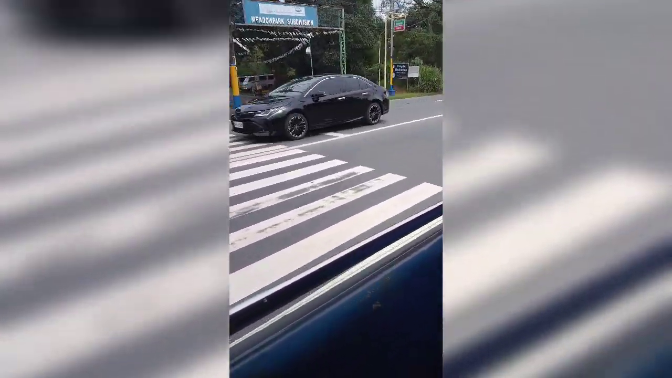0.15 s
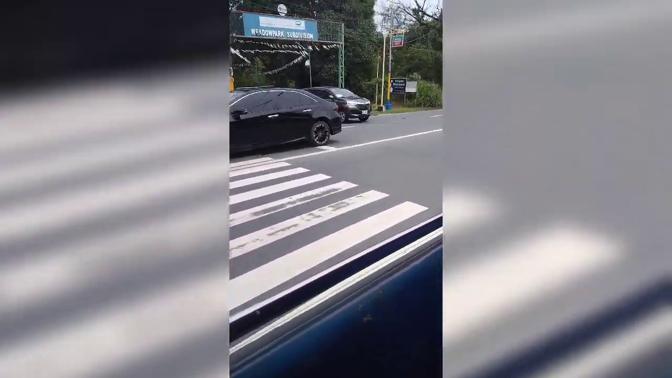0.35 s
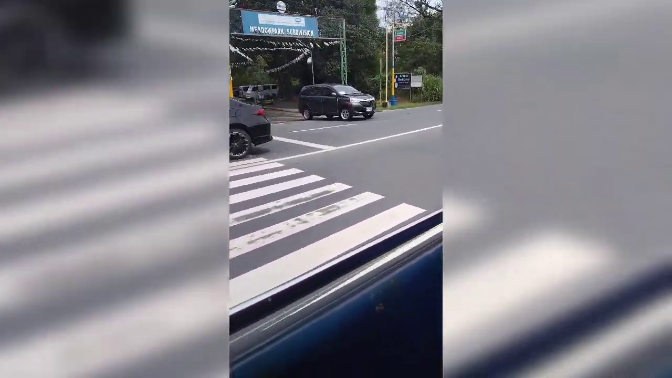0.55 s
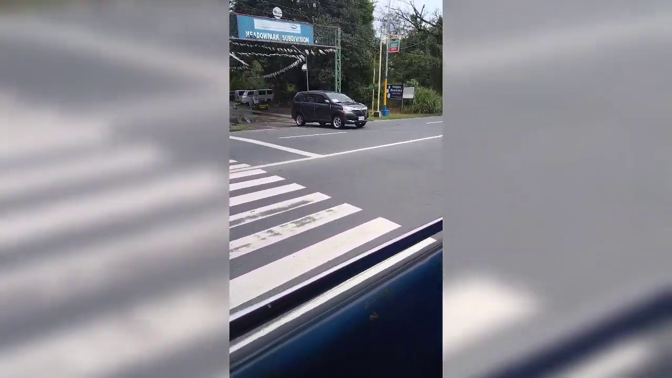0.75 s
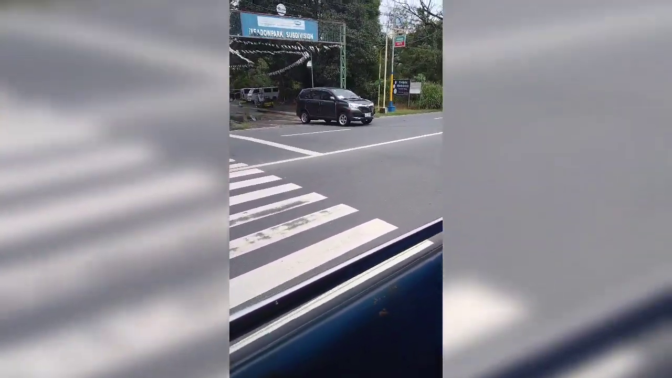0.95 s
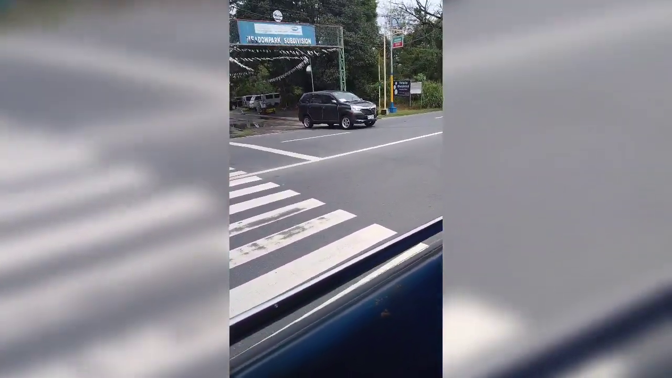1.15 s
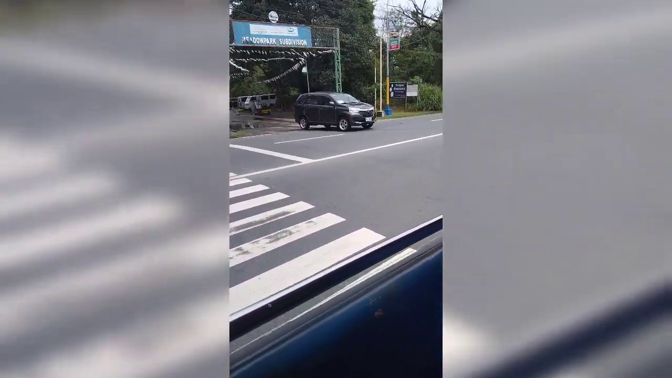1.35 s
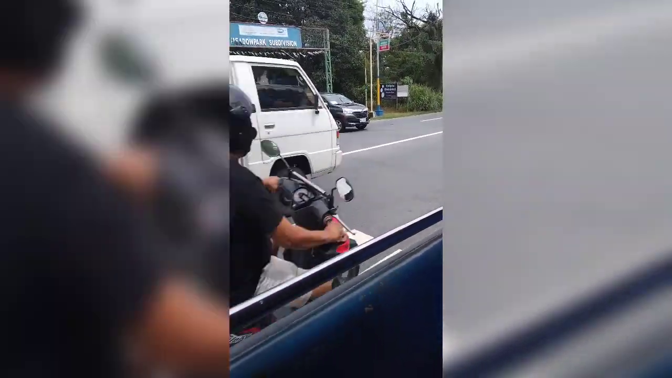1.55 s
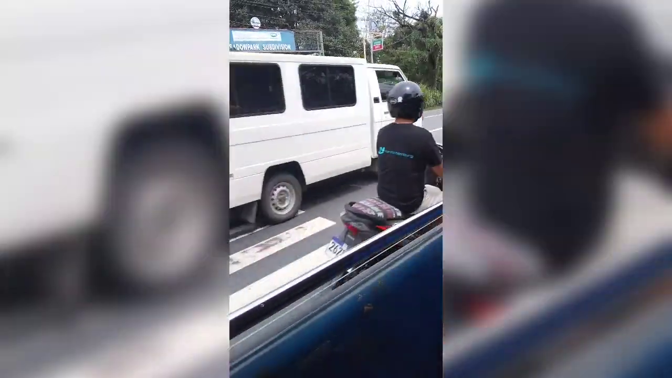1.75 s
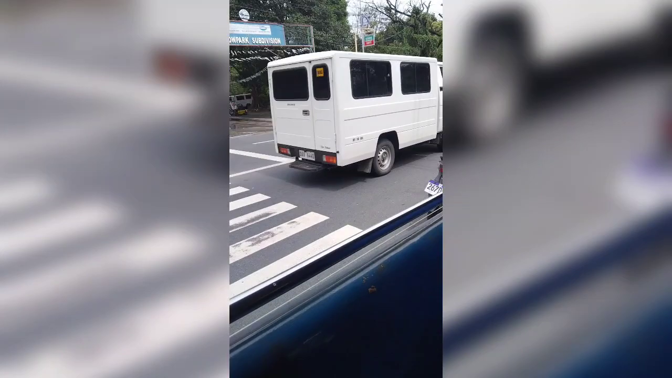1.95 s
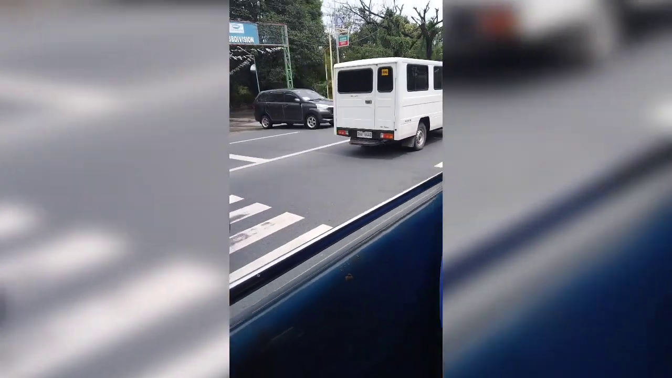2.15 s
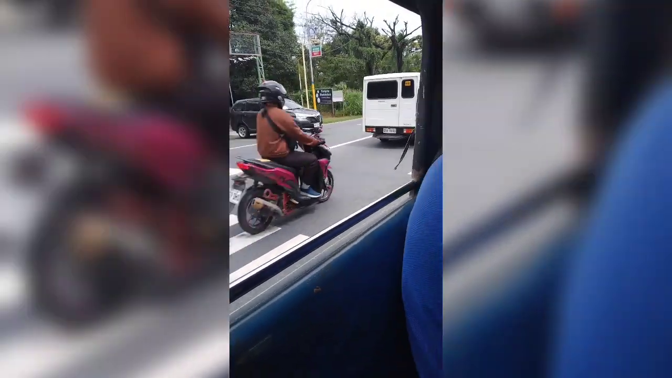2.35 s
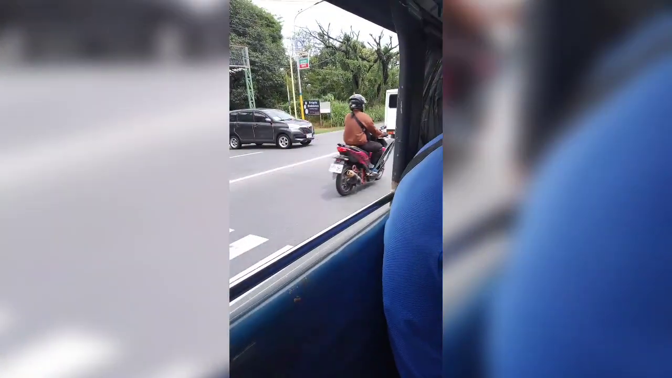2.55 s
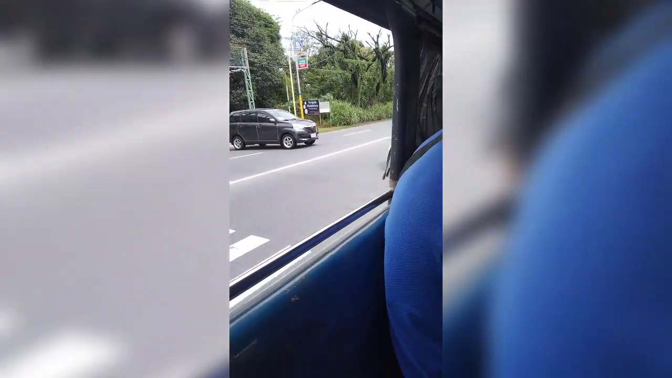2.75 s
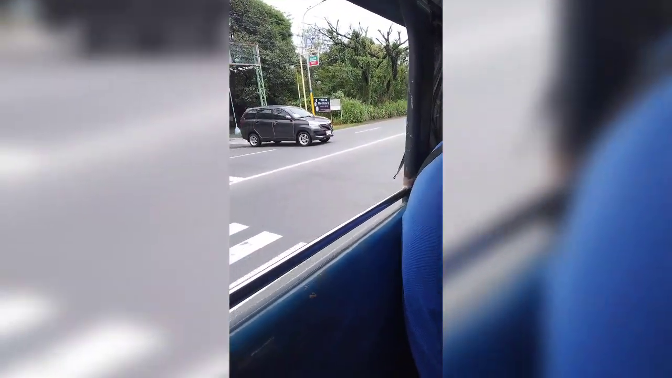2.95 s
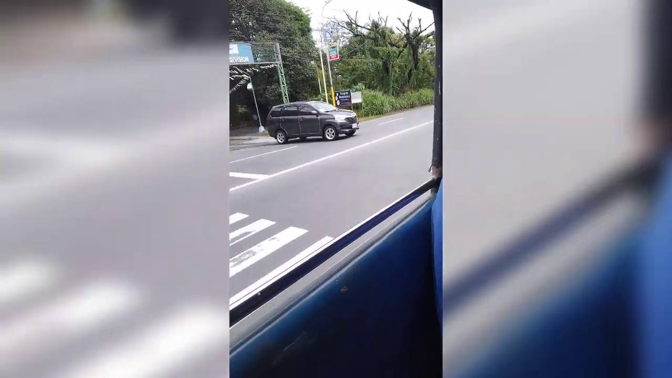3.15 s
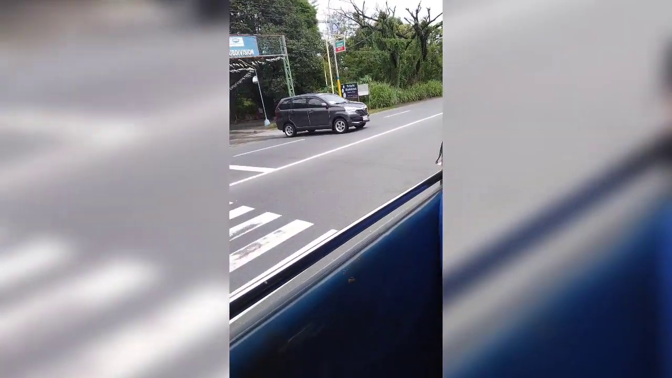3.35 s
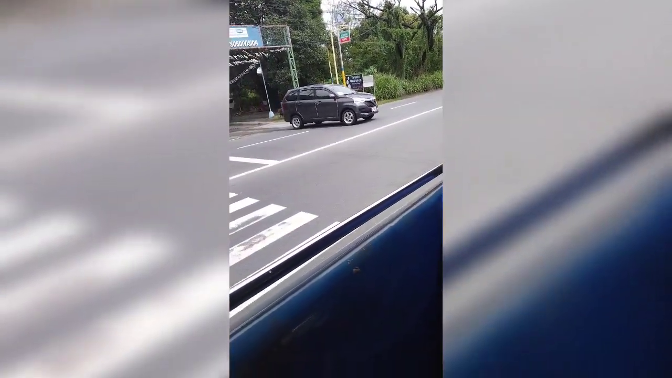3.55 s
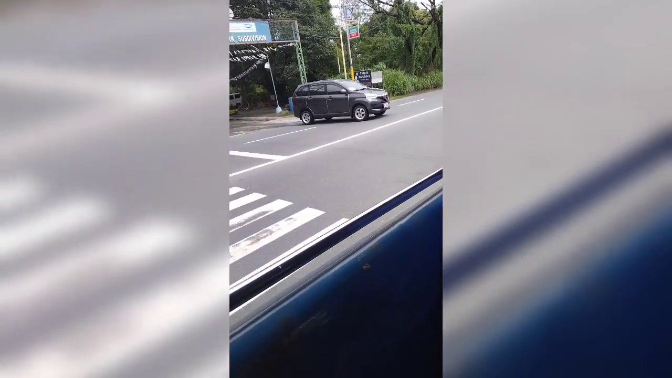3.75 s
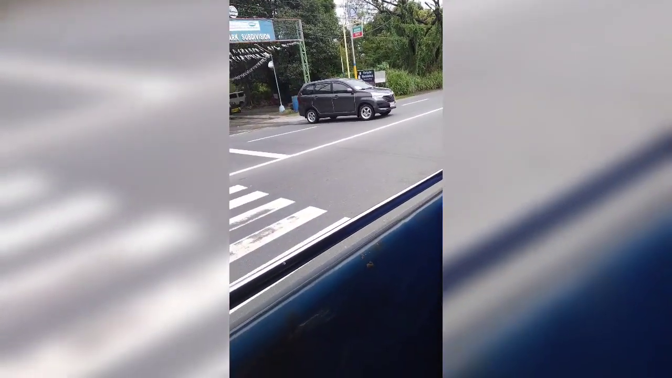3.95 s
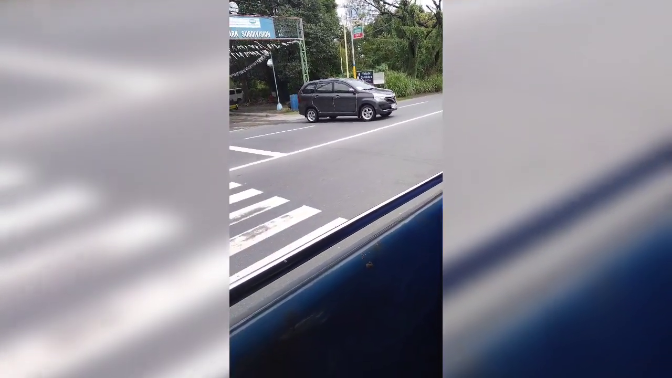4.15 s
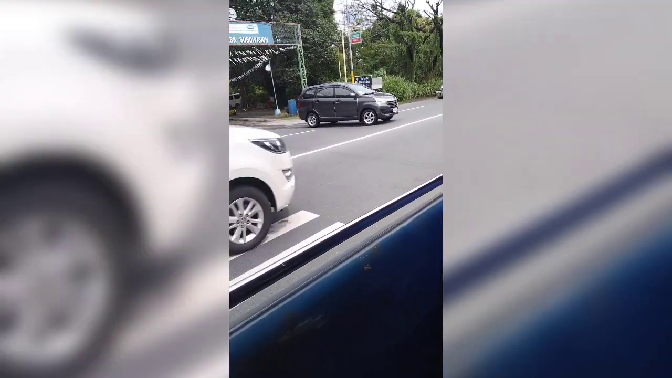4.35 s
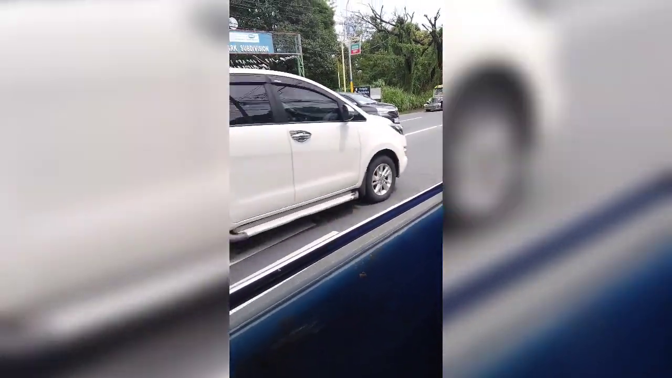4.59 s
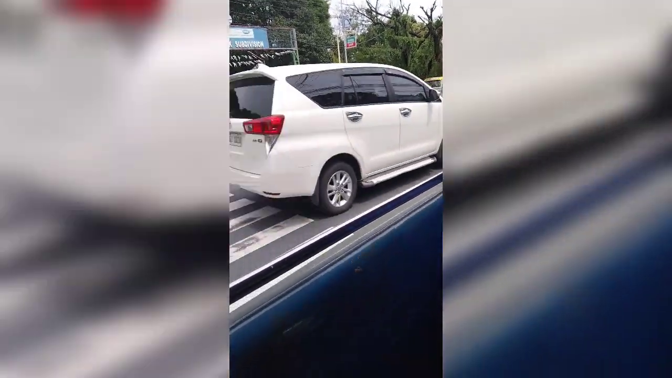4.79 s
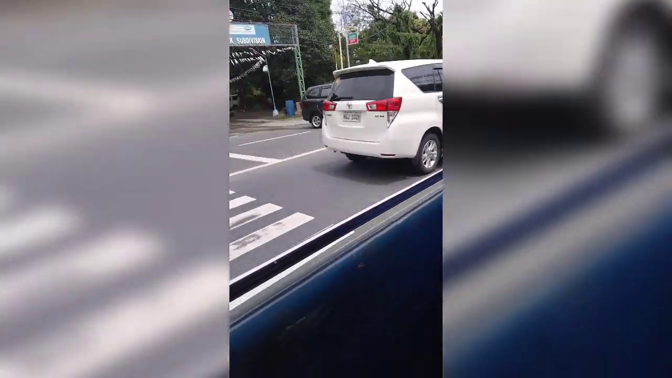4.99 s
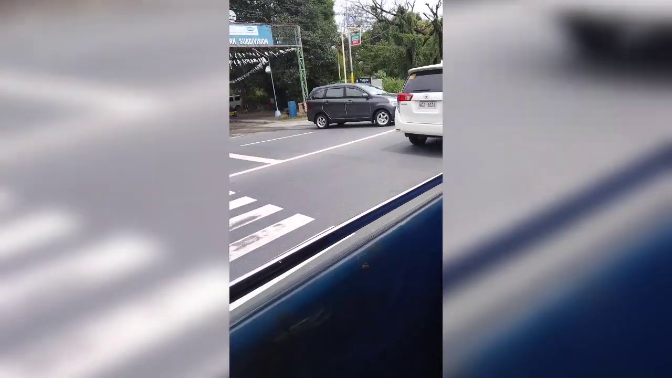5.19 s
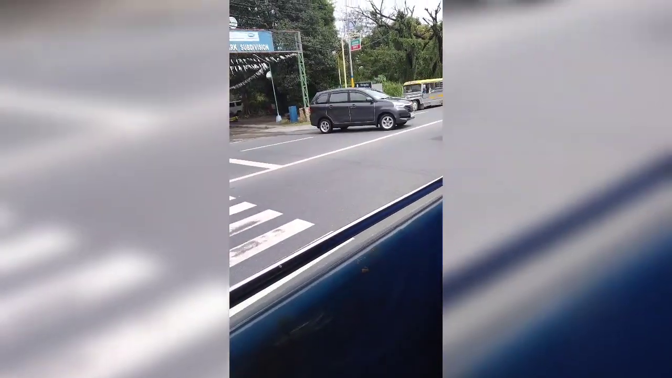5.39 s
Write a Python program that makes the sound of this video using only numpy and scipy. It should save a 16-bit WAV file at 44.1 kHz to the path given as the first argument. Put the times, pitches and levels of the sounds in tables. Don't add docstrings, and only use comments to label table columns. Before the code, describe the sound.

Traffic heard at a vehicle window: two motorbikes sweep by with low exhaust notes, a dull door shuts, and a car whooshes past.

```python
import sys
import numpy as np
from scipy import signal
from scipy.fft import rfft, irfft, next_fast_len
from scipy.io import wavfile
from scipy.ndimage import uniform_filter1d

SR = 44100
rng = np.random.default_rng(int(sys.argv[2]) if len(sys.argv) > 2 else 0)


def inscribe(sig):
    pcm = np.round(np.clip(np.atleast_2d(sig).T, -1, 1) * 32767)
    wavfile.write(sys.argv[1], SR, pcm.astype(np.int16))


def gain_from_db(level_db):
    decades = np.asarray(level_db, float) / 20
    return 10 ** decades


N = 239154
T = np.arange(N) / SR
FFT = next_fast_len(N)
HZ = np.arange(FFT // 2 + 1) * SR / FFT

# (frequency [Hz], density [dB per Hz])
STREET_SPECTRUM = [(25, -32.5), (70, -3), (113, -2.5), (250, -7.5), (550, -10.5), (800, -19.5),
                   (1370, -15.5), (2000, -11.5), (3000, -20.5), (5000, -24.5), (8300, -27), (9500, -30),
                   (12000, -33.5), (15400, -37)]
STREET_DB = -39
# (frequency [Hz], width [Hz], level [dB])
CABIN_MODES = [(918, 170, -56), (1321, 97, -50.5), (1678, 52, -54.5), (2190, 49, -63), (2400, 46, -57),
               (3835, 410, -61)]
# (time [s], level [dB])
IDLE_SHAKE = [(0, 0.5), (1.2, -0.5), (2.8, 3.5), (3.3, 3), (3.8, -0.5), (4.2, -12), (5.42, 2)]
# (time [s], level [dB])
FLOOR_KNOCKS = [
    (3.445, -32.5),
    (3.943, -30),
]
KNOCK_HZ, KNOCK_RISE_S, KNOCK_T60_S = 125, .014, .05

# (time [s], level [dB], t60 [s], low edge [Hz], high edge [Hz])
AIR_PUFFS = [
    (.205, -46, 0.11, 6700, 9200),
    (.517, -40, 0.71, 2500, 6760),
    (.535, -48.5, 0.22, 7000, 15300),
    (.749, -31, 0.15, 2400, 4970),
    (1.52, -41, .09, 1980, 14000),
    (3.19, -51, 0.061, 9900, 11300),
    (3.88, -49, 0.2, 8000, 15000),
    (4.11, -46.5, 0.38, 1190, 8750),
]
PUFF_RISE_S = 0.0048
# (time [s], level [dB], t60 [s], low edge [Hz],
# high edge [Hz])
CRACKS = [
    (.719, -34.5, 0.03, 2240, 11100),
    (4.061, -32.5, 0.11, 1160, 8000),
    (4.62, -47, .047, 8900, 15200),
    (4.806, -43.5, 0.063, 1490, 15120),
    (5.223, -43, 0.4, 1460, 1670),
]
CRACK_RISE_S = 0.0072
# (time [s], level [dB], t60 [s], low edge [Hz], high edge [Hz])
TYRE_SINGING = [
    (1.7, -41, 1.8, 2210, 3180),
]
TYRE_SONG_RISE_S = 0.11
# (time [s], level [dB], t60 [s], low edge [Hz], high edge [Hz])
BODY_BUMPS = [
    (4.12, -39, 0.34, 200, 600),
    (5.25, -40, 0.63, 149, 398),
]
BUMP_RISE_S = 0.0068
# (time [s], level [dB], t60 [s], frequency [Hz])
NARROW_RINGS = [(.0, -49.5, 0.41, 917), (.06, -51.5, 4.6, 2400), (.29, -49.5, 0.78, 2102),
                (0.619, -49, 0.86, 917), (.86, -51, 1.4, 1642), (3.76, -53, 0.86, 3733),
                (.57, -41, 0.06, 2255), (.65, -41, 0.063, 2134), (.67, -47.5, 0.47, 3940),
                (1.49, -37.5, 0.47, 416), (1.69, -38.5, 0.34, 382), (2.13, -33.5, 1, 421),
                (2.61, -32, 0.39, 373), (3.14, -44, 0.61, 583), (4.199, -44.5, 0.94, 1612),
                (4.42, -45, 0.27, 600), (3.8, -51, 0.3, 2980), (3.915, -45, .09, 958),
                (4.55, -47.5, 2.7, 926), (5.223, -36, 2.6, 1601), (5.34, -38, 0.48, 337)]
RING_WIDTH_HZ, RING_RISE_S = 57, 0.0094

# (frequency [Hz], level [dB], t60 [s])
DOOR_MODES = [(131, 1, 0.18), (189.4, -4, 0.29), (253, -18.5, 0.75), (289.5, -7, 0.4), (402, 2.5, 0.15),
              (494, -16.5, .3), (563, -8.5, 0.21), (618, -29, 0.32), (1314, -20.5, 0.049)]
DOOR_S, DOOR_DB, DOOR_RISE_S = 4.047, -18.5, 0.015

# (time [s], level [dB], hold [s], t60 [s])
EXHAUST_BLASTS = [
    (1.549, -17, .11, 0.21),
    (1.742, -25.5, 0.021, 0.42),
]
BOOM_HZ, BOOM_SAG_HZ_PER_S, BOOM_RISE_S = 124.5, 12, .035
UPPER_HZ, UPPER_SINKS_TO_HZ, UPPER_SINK_S, UPPER_DB = 268, 212, 0.109, -14.5
RUMBLE_DB = -19

# (frequency at rest [Hz], level [dB], start [s], end [s])
GEAR_WHINES = [
    (10530, -59, 1.82, 2.45),
    (10620, -60, 2.85, 3.35),
    (14400, -60.5, 1.7, 2.72),
    (14350, -62, 2.9, 3.35),
    (15100, -63, 2.18, 2.75),
]
BIKE_PASSES_S, BIKE_SPEED_M_S, BIKE_KERB_M, WHINE_FLICKER_DB = 2.2, 8, 1.9, 3.5
# (time [s], muffler level [dB])
BIKE_THROTTLE = [
    (2.05, -47),
    (2.16, -38),
    (2.27, -32.5),
    (2.36, -26),
    (2.446, -37),
    (2.5, -32),
    (2.63, -35.5),
    (2.74, -45.5),
    (2.95, -51.5),
]
# (frequency [Hz], width [Hz], level [dB])
MUFFLER_MODES = [
    [(270, 72, 28), (200, 60, -20)],
    [(382, 67, 2), (600, 110, -43)],
]
FIRING_HZ, UPPER_MUFFLER_DB, UPPER_STRAY_DB = 44.4, -8.5, 6

# (frequency [Hz], density [dB per Hz])
FIRST_BIKE_SPECTRUM = [(500, 1), (790, -9.5), (1000, -9), (1200, -13), (1350, -5), (1640, -0.5),
                       (1900, -5.5), (2200, -9.5), (3350, -13), (4500, -18.5), (7500, -21), (9500, -28),
                       (15400, -32)]
SECOND_BIKE_SPECTRUM = [(500, -18), (650, -11), (780, -19), (950, -4.5), (1170, -9), (1370, -5.5),
                        (1800, -6.5), (2390, -2), (4000, -11), (7000, -16.5), (9800, -22), (15400, -30.5)]
CAR_SPECTRUM = [(500, -16), (800, -25.5), (940, -12), (1170, -11.5), (1330, -5), (1570, 1.5), (1900, -8),
                (2300, 1.5), (3550, -3), (4200, -10), (5900, -15), (7500, -21.5), (15400, -30.5)]
# (time [s], level of the rush's body [dB])
NEARNESS = [
    [(.6, -56), (.8, -49.5), (1.0, -48.5), (1.2, -43), (1.37, -36.5), (1.53, -36), (1.62, -43), (1.75, -51),
     (1.95, -64)],
    [(1.6, -90), (1.8, -49), (2.05, -39.5), (2.14, -32), (2.45, -31.5), (2.6, -34), (2.8, -41), (3.3, -51),
     (3.75, -61.5)],
    [(3.8, -46), (4.12, -46.5), (4.25, -43.5), (4.5, -38), (4.65, -38.5), (4.85, -38.5), (5.15, -41.5),
     (5.3, -41), (5.42, -40)],
]
# (hiss [dB at body -40 dB], air [dB at body -40 dB], hiss share [dB/dB],
# air share [dB/dB], lead [s])
BRIGHTNESS = [
    (-38.5, -42, 0.5, 0.24, 0.03),
    (-40.5, -43.5, 0.5, 0.43, 0.073),
    (-45.5, -44, 0.75, 0.67, 0.015),
]
BASS_DB, BASS_SHARE, BASS_LAG_S = -8.5, 3.8, 0.06

# (frequency [Hz], gain [dB])
SUPPRESSOR_FLOOR = [(60, -8), (300, -15), (1000, -17.5), (3000, -27.5), (5500, -21.5), (8300, -31.5),
                    (9800, -11.5), (15000, -10)]
TOP_HZ = 15540


def unit(x):
    return x / np.sqrt(np.mean(x ** 2) + 1e-30)


def shape(hz, points):
    f, db = np.transpose(points)
    return np.interp(np.log(np.maximum(hz, 1)), np.log(f), db)


def noise(gain):
    return unit(irfft(rfft(rng.standard_normal(FFT)) * gain, FFT)[:N])


def coloured(points):
    return noise(gain_from_db(shape(HZ, points)))


def band(x, lo_hz, hi_hz, order=2):
    sos = signal.butter(order, [lo_hz, min(hi_hz, .45 * SR)], "band", fs=SR, output="sos")
    return signal.sosfilt(sos, x)


def ring(x, modes):
    return unit(sum(gain_from_db(db) * unit(band(x, hz - w / 2, hz + w / 2)) for hz, w, db in modes))


def walk(rate):
    place = T * np.clip(rate, .1, 300)
    k = place.astype(int)
    levels = rng.standard_normal(2000)
    return 1.15 * (levels[k] + (levels[k + 1] - levels[k]) * (place - k))


def tone(hz, drift_hz):
    phase = 2 * np.pi * np.cumsum(hz + drift_hz * walk(120)) / SR
    return gain_from_db(0.72 * walk(30.55)) * np.sqrt(2) * np.sin(phase)


def columns(table, fade_s=0.012):
    s, *cols = np.transpose(table)
    window = np.clip(np.minimum(T - s[0], s[-1] + fade_s - T) / fade_s, 0, 1)
    return window, [np.interp(T, s, c) for c in cols]


def burst(s, rise_s, t60_s, hold_s=0):
    age = np.maximum(T - s, 0)
    rise = np.sin(np.pi / 2 * np.minimum(age / rise_s, 1)) ** 2
    return rise * 1000 ** (-np.maximum(age - rise_s - hold_s, 0) / t60_s)


def street():
    out = gain_from_db(STREET_DB) * coloured(STREET_SPECTRUM)
    for hz, w, db in CABIN_MODES:
        flicker_db = np.interp(T, *np.transpose(IDLE_SHAKE)) + .4 * walk(4) + 1.3 * walk(20)
        out = out + gain_from_db(db + flicker_db) * unit(band(rng.standard_normal(N), hz - w / 2, hz + w / 2))
    return out


def knocks():
    out = 0
    for s, db in FLOOR_KNOCKS:
        mode = np.sin(2 * np.pi * KNOCK_HZ * (T - s))
        out = out + gain_from_db(db) * burst(s, KNOCK_RISE_S, KNOCK_T60_S) * mode
    return out


def rushes(table, rise_s):
    out = np.zeros(N)
    for s, db, t60, lo, hi in table:
        start = int(s * SR)
        span = slice(start, min(start + SR // 2 + SR // 4, N))
        envelope = burst(s, rise_s, t60)[span]
        settled = band(rng.standard_normal(SR), lo, hi)[SR // 4:]
        rush = envelope * settled[:len(envelope)]
        out[span] += gain_from_db(db) * unit(rush) * np.sqrt(np.mean(envelope ** 2))
    return out


def small_sounds():
    half = RING_WIDTH_HZ / 2
    rings = [(s, db, t60, hz - half, hz + half) for s, db, t60, hz in NARROW_RINGS]
    air = rushes(AIR_PUFFS, PUFF_RISE_S)
    cracks = rushes(CRACKS, CRACK_RISE_S)
    tyres = rushes(TYRE_SINGING, TYRE_SONG_RISE_S)
    return air + cracks + tyres + rushes(rings, RING_RISE_S) + rushes(BODY_BUMPS, BUMP_RISE_S)


def door():
    out = 0
    for hz, db, t60 in DOOR_MODES:
        late_s = DOOR_S + .013 * abs(np.log(hz / 340))
        shake = 1 + .5 * walk(45)
        phase = 2 * np.pi * (hz * (T - late_s) + 0.33 * walk(30))
        out = out + gain_from_db(db) * burst(late_s, DOOR_RISE_S, t60) * shake * np.sin(phase)
    blow = unit(band(rng.standard_normal(N), 76, 430, order=3))
    thud = gain_from_db(-10) * burst(DOOR_S, 0.02, 0.55) * blow
    return gain_from_db(DOOR_DB) * (out + thud)


def boom():
    age = np.maximum(T - EXHAUST_BLASTS[0][0], 0)
    gains = [gain_from_db(db) * burst(s, BOOM_RISE_S, t60, hold) for s, db, hold, t60 in EXHAUST_BLASTS]
    low_hz = (BOOM_HZ - BOOM_SAG_HZ_PER_S * np.minimum(age, 1)) * (1 + 0.019 * walk(41.6))
    low = np.sqrt(2) * np.sin(2 * np.pi * np.cumsum(low_hz) / SR)
    rumble = unit(band(rng.standard_normal(N), 86, 185))
    upper_hz = UPPER_SINKS_TO_HZ + (UPPER_HZ - UPPER_SINKS_TO_HZ) * np.exp(-age / UPPER_SINK_S)
    upper = tone(upper_hz, drift_hz=11.8)
    return sum(gains) * (low + gain_from_db(RUMBLE_DB) * rumble) + gains[0] * gain_from_db(UPPER_DB) * upper


def whine(hz, db, from_s, to_s):
    along_m = BIKE_SPEED_M_S * (T - BIKE_PASSES_S)
    far_m = np.hypot(along_m, BIKE_KERB_M)
    doppler = 1 - BIKE_SPEED_M_S / 343 * along_m / far_m
    window = np.clip(np.minimum(T - from_s, to_s - T) / 0.074, 0, 1) * BIKE_KERB_M / far_m
    return window * gain_from_db(db + WHINE_FLICKER_DB * walk(16)) * tone(hz * doppler, drift_hz=35.2)


def throb():
    window, (db,) = columns(BIKE_THROTTLE)
    cycle = np.cumsum(FIRING_HZ * (1 + 0.0091 * walk(30))) / SR
    strength = gain_from_db(0.52 * rng.standard_normal(N)[cycle.astype(int)])
    pulses = unit(np.diff(np.floor(cycle), prepend=0) * strength)
    gas = rng.standard_normal(N) * unit(np.exp(-(cycle % 1) / 1.9))
    low = ring(pulses + 0.54 * gas, MUFFLER_MODES[0])
    high = ring(pulses + 3.1 * gas, MUFFLER_MODES[1])
    high_gain = gain_from_db(UPPER_MUFFLER_DB + UPPER_STRAY_DB * walk(10))
    return window * gain_from_db(db) * (low + high_gain * high)


def passer(near, bright, spectrum):
    hiss_db, air_db, hiss_share, air_share, lead_s = bright
    window, (body_db,) = columns(near, fade_s=0.11)
    ahead_db = np.interp(T + lead_s, T, body_db) + 40
    peak_db = body_db.max()
    late_db = np.interp(T - BASS_LAG_S, T, body_db)
    bass_db = BASS_DB + peak_db + BASS_SHARE * (late_db - peak_db)
    levels_db = bass_db, body_db, hiss_db + hiss_share * ahead_db, air_db + air_share * ahead_db
    over = [1 / (1 + (edge_hz / (HZ + 1)) ** 8) for edge_hz in (800, 1950, 4700)]
    shares = 1 - over[0], over[0] - over[1], over[1] - over[2], over[2]
    gain = gain_from_db(shape(HZ, spectrum))
    rush = sum(gain_from_db(db) * noise(gain * np.sqrt(share)) for db, share in zip(levels_db, shares))
    return window * rush * gain_from_db(0.79 * walk(25))


def scene():
    background = street() + knocks() + small_sounds() + door()
    engines = boom() + sum(whine(*w) for w in GEAR_WHINES) + throb()
    spectra = FIRST_BIKE_SPECTRUM, SECOND_BIKE_SPECTRUM, CAR_SPECTRUM
    traffic = sum(passer(*p) for p in zip(NEARNESS, BRIGHTNESS, spectra))
    return (background + engines + traffic)[None]


def suppress(x, size=1024):
    margin_db, attack, release, quiet_share, stray_db = 3.6, .45, .16, .12, 3.3
    hz, _, z = signal.stft(x, SR, nperseg=size, noverlap=size - size // 4)
    power = uniform_filter1d(np.abs(z) ** 2, size=3, axis=0)
    quiet = np.quantile(uniform_filter1d(power, size=40, axis=1), quiet_share, axis=1)
    roar = np.exp(uniform_filter1d(np.log(quiet), size=11)) * gain_from_db(2 * margin_db)
    stray = uniform_filter1d(rng.standard_normal(power.shape), size=3, axis=0)
    stray = uniform_filter1d(stray, size=30, axis=1)
    stray = np.minimum(unit(stray), 0)
    depth_db = shape(hz, SUPPRESSOR_FLOOR)
    roar = roar[:, None] * gain_from_db(2 * stray_db * stray * (depth_db[:, None] / depth_db.min()) ** 2)
    heard, gain = np.ones(len(hz)), np.empty(power.shape)
    for k, snr in enumerate((power / roar).T):
        heard = heard + (snr - heard) * np.where(snr > 6 * heard, attack, release)
        gain[:, k] = np.maximum(1 - 1 / (heard + 1e-9) ** 1.3, gain_from_db(depth_db))
    gain[hz > TOP_HZ] = 0
    return signal.istft(z * gain, SR, nperseg=size, noverlap=size - size // 4)[1][:N]


def roll_off(x):
    return signal.sosfilt(signal.butter(12, 16430, fs=SR, output="sos"), x)


def record(dry):
    mix = suppress(dry[0])[None]
    return roll_off(mix)


dry = scene()
out = record(dry)
inscribe(out)
```